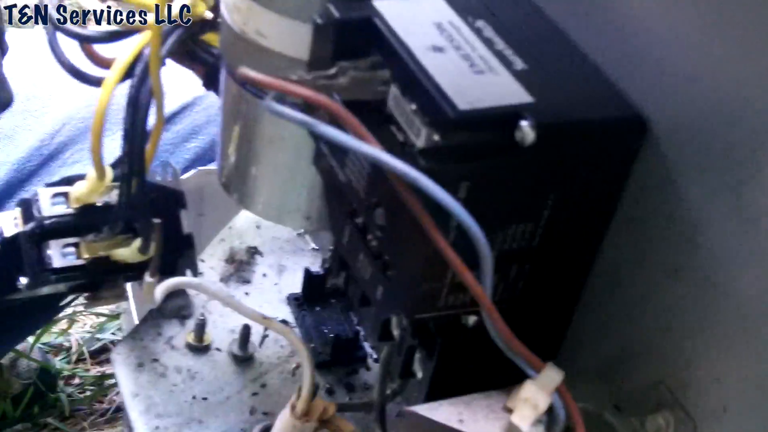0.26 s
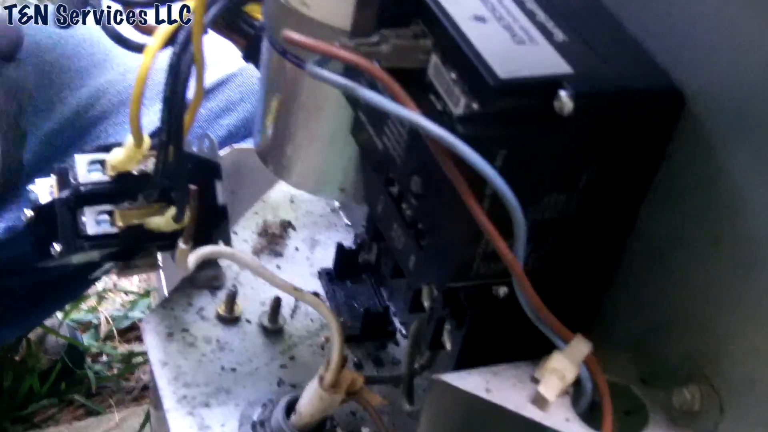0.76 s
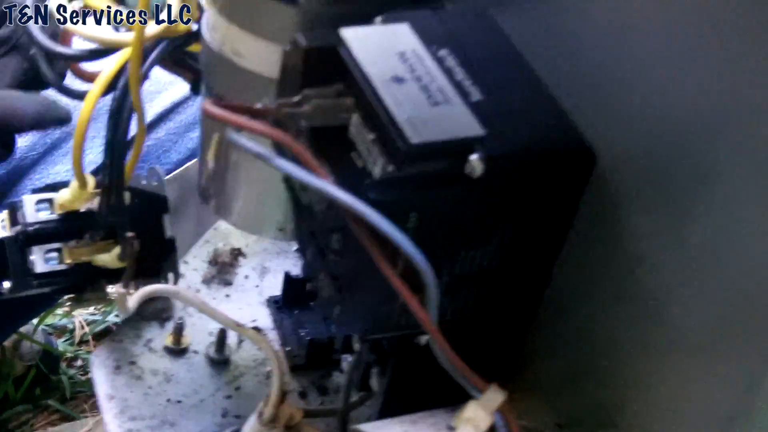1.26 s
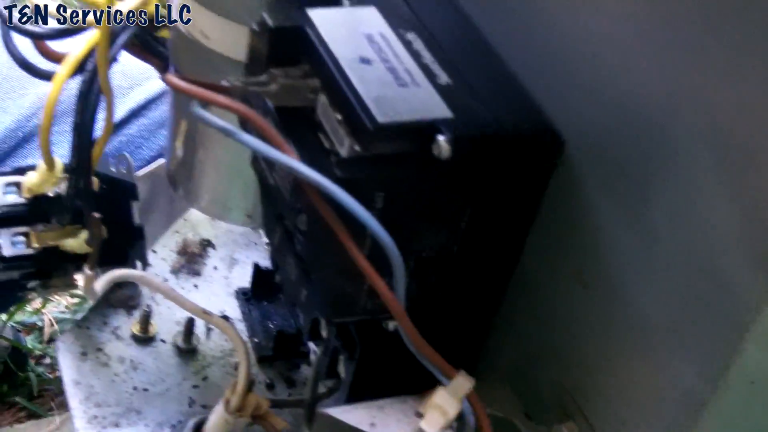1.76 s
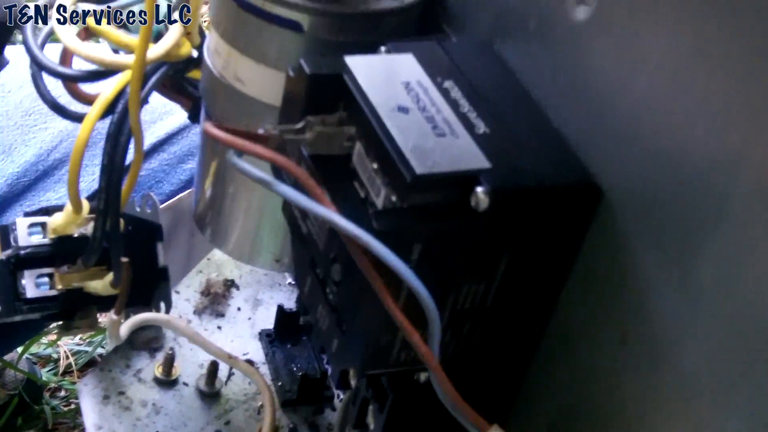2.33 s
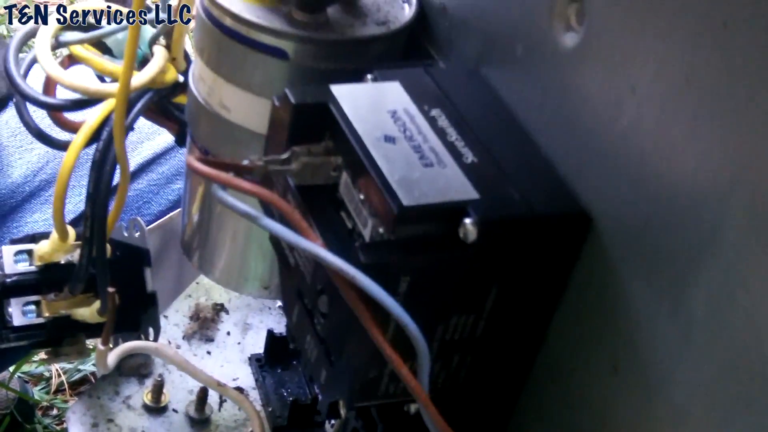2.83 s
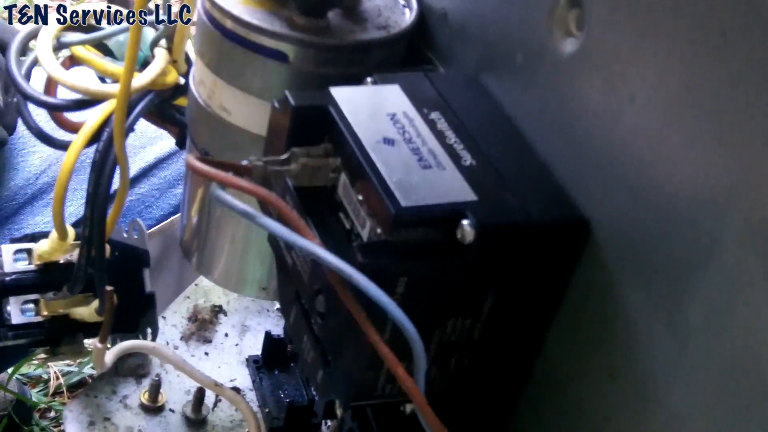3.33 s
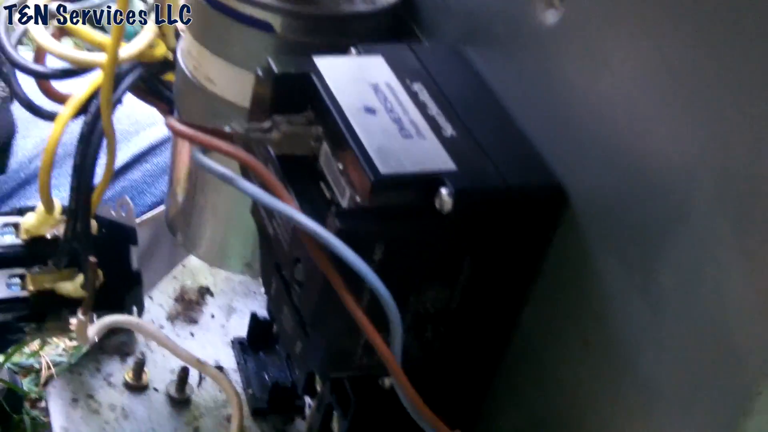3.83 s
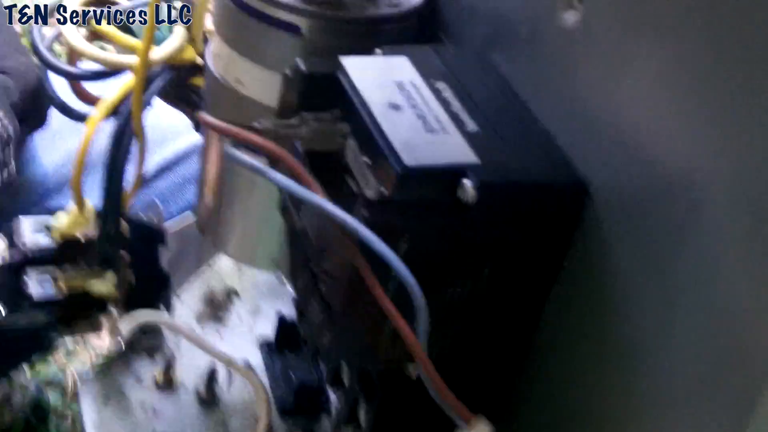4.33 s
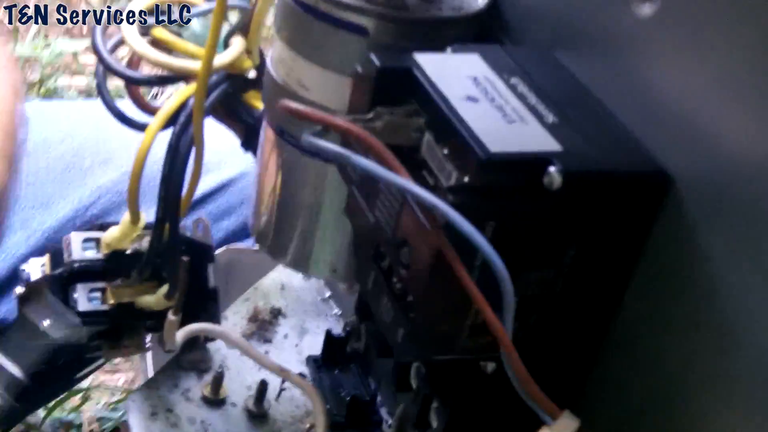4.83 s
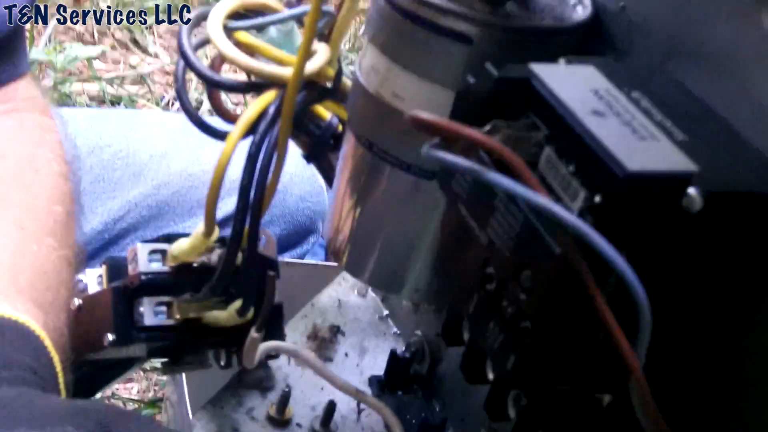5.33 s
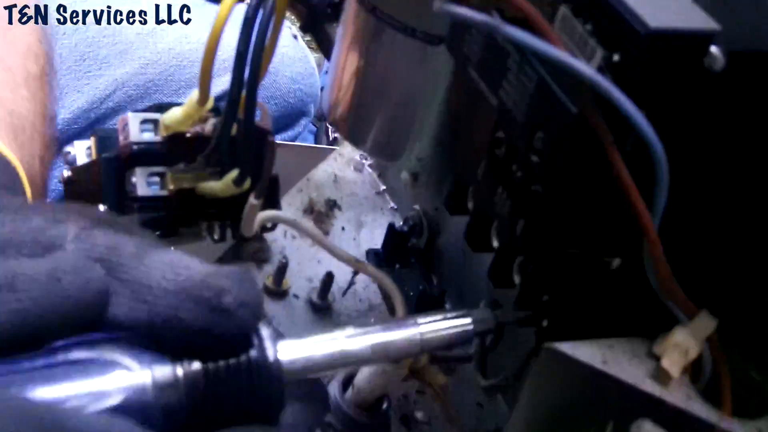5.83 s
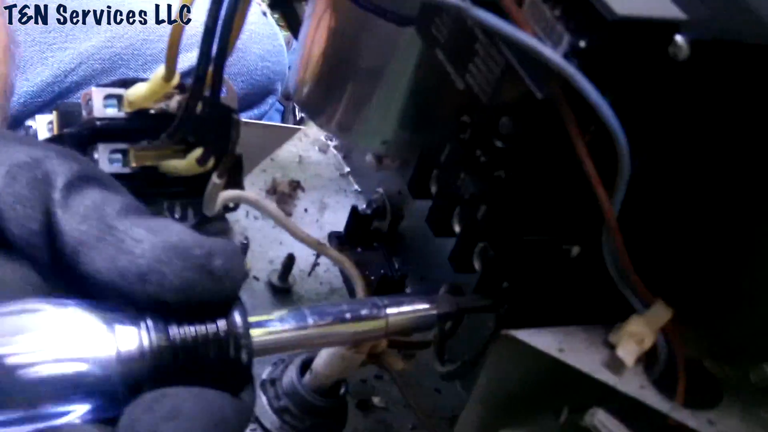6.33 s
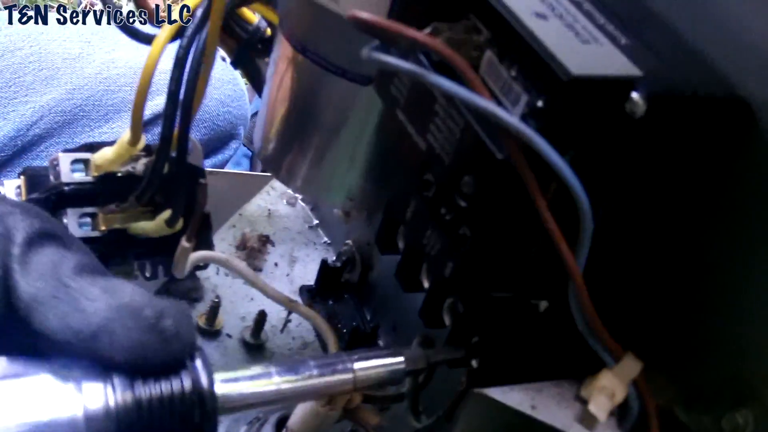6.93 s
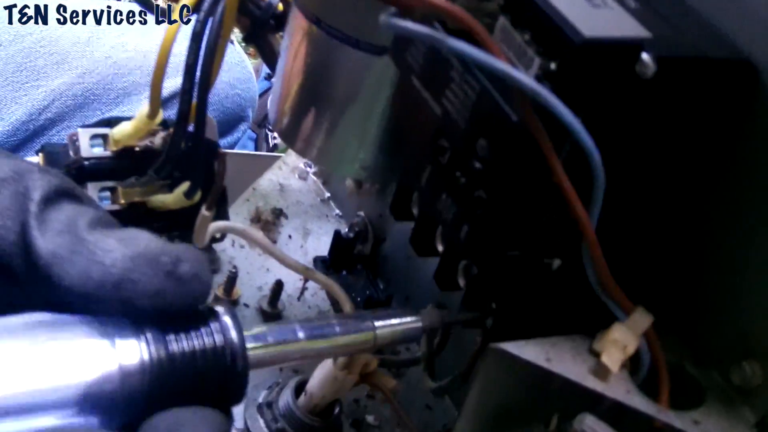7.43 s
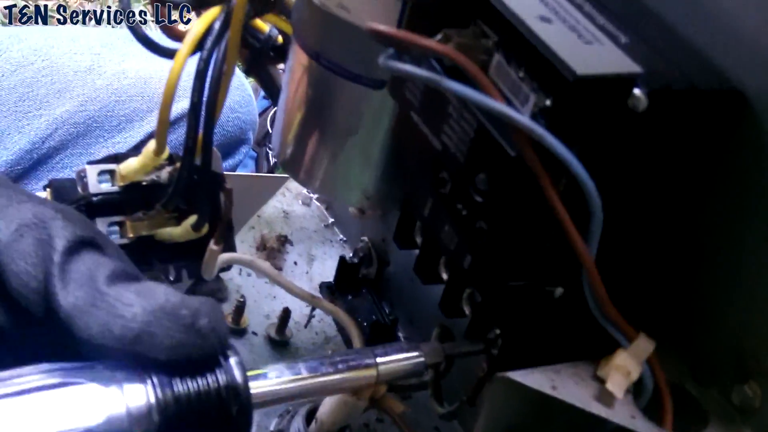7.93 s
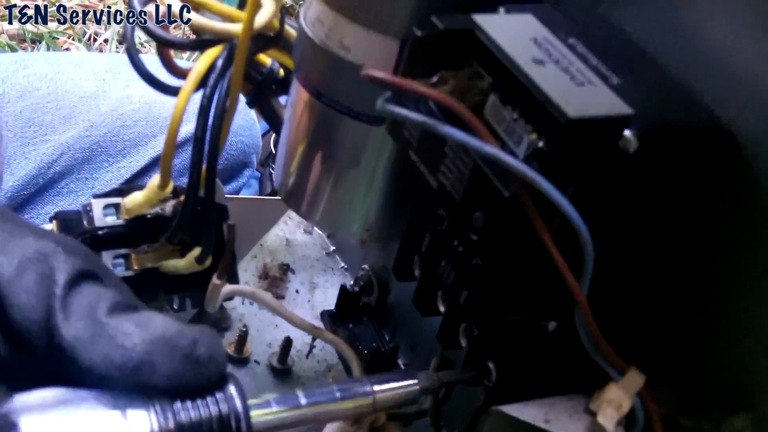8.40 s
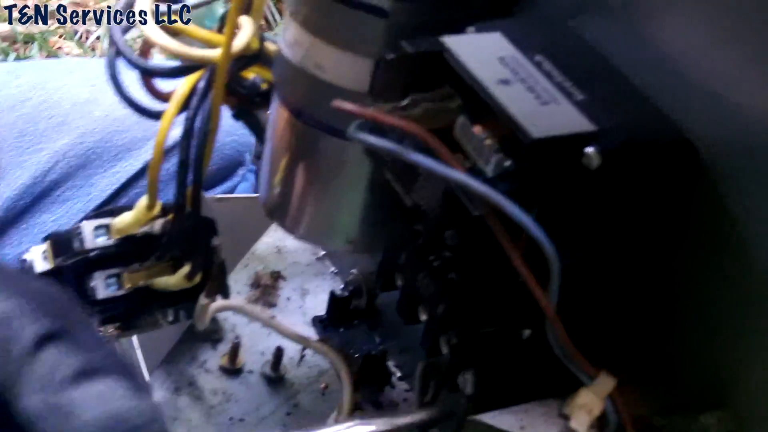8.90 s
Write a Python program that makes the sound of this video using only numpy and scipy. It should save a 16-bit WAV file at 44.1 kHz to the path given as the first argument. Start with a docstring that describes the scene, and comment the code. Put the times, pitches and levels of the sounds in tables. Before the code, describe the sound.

Close up outdoors, terminals click sharply, then a tool raps hollow sheet metal and turns a screw in grainy strokes, with brief rubbery squeaks.

```python
"""Gloved hands work on the wiring in an outdoor air conditioner's control panel, close to one microphone.
A connector rasps off its tab and terminals snap: bursts of tiny impacts and wall reflections, some tabs ringing.
Then a screwdriver knocks in the sheet-metal cabinet, whose modes ring and rattle, and turns a screw in short
strokes of grainy friction noise. The glove squeaks in gliding tones and rustles in puffs of noise.
Under it all lies a low outdoor hiss of filtered noise."""
import sys
import numpy as np
from scipy import signal
from scipy.fft import rfft, irfft, next_fast_len
from scipy.io import wavfile
from scipy.ndimage import uniform_filter1d

SR = 44100
rng = np.random.default_rng(int(sys.argv[2]) if len(sys.argv) > 2 else 0)


def unload_audio(sound):
    """Save the sound as a 16-bit wav file, at the path given as the first command line argument."""
    columns = np.transpose(np.atleast_2d(sound))
    # keep every value between -1 and 1, then stretch to whole-number steps
    steps = np.round(np.clip(columns, -1, 1) * 32767)
    wavfile.write(sys.argv[1], SR, steps.astype(np.int16))


N = 403956  # samples, about 9.2 s


# Levels are those of the sources, ahead of the microphone's own filters in record().
def amp(db):
    """Decibels to gain."""
    return 10 ** (np.asarray(db) / 20)


def read(points, hz):
    """A spectrum's value at hz, on a log-frequency axis."""
    f, value = np.transpose(points)
    return np.interp(np.log(hz + 1), np.log(f + 1), value)


def evened(x):
    """Scales to rms 1."""
    return x / np.sqrt(np.mean(x ** 2) + 1e-20)


def blow(x, db):
    """Scales a hit to the energy of 10 ms at level db."""
    return amp(db) * x * np.sqrt(0.01 * SR / (np.sum(x ** 2) + 1e-20))


def add(mix, s, sound):
    """Mixes a sound in at time s."""
    part = mix[max(round(s * SR), 0):][:len(sound)]
    part += sound[:len(part)]


def hump(hz, centre_hz, octaves):
    """A bell from 0 to 1 round a pitch."""
    return np.exp(-0.5 * (np.log2((hz + 1) / centre_hz) / octaves) ** 2)


def shaped(x, points):
    """Filters a long sound by a spectrum."""
    size = next_fast_len(len(x) + 4096)
    gain = amp(read(points, np.fft.rfftfreq(size, 1 / SR)))
    return irfft(rfft(x, size) * gain, size)[:len(x)]


def coloured(x, points, centre_hz, lift_db, octaves, size):
    """Gives a hit its broad colour with a causal filter, keeping its sharp start and fine ripple."""
    z = np.fft.fft(x)
    hz = abs(np.fft.fftfreq(len(x), 1 / SR))
    own_power = uniform_filter1d(abs(z) ** 2, size, mode="wrap")
    own_colour = np.sqrt(abs(own_power) + 1e-12)
    wanted_db = read(points, hz) + lift_db * hump(hz, centre_hz, octaves)
    log_gain = np.log(amp(wanted_db) / own_colour)
    causal_gain = np.exp(np.conj(signal.hilbert(log_gain)))
    return np.fft.ifft(z * causal_gain).real


# Colour of the outdoor air and hiss. Each row: frequency in Hz, relative density in dB per Hz.
AIR_SPECTRUM = [(20, -29), (70, -27), (115, -36.5), (175, -33.5), (285, -42.5), (490, -35), (590, -38),
                (720, -36.5), (1020, -36), (1400, -40.5), (2100, -46.5), (4800, -48.5), (6300, -57.5),
                (7300, -61.5), (10500, -55.5), (15500, -56.5)]
AIR_DB = -43.5


def outdoors(drift_db=1.0):
    """Steady outdoor air and microphone hiss: filtered noise drifting in faint patches of time and pitch."""
    z = signal.stft(rng.standard_normal(N), nperseg=1024)[2]
    patches = uniform_filter1d(rng.standard_normal(z.shape), size=7, axis=0)
    patches = evened(uniform_filter1d(patches, size=16, axis=1))
    air = signal.istft(z * amp(drift_db * patches), nperseg=1024)[1][:N]
    return amp(AIR_DB) * evened(shaped(air, AIR_SPECTRUM))


# Broad colour of a contact click. Each row: frequency in Hz, relative density in dB per Hz.
CLICK_SPECTRUM = [(60, -9), (400, -12.5), (750, -0.5), (2500, -0.5), (5400, -2), (6400, -9.5), (7300, -16),
                  (11000, -18.5), (15500, -45)]


def click(chatter_s, hz, lift_db, echo_db, echo_t60, crisp_db=7, size=4096):
    """A cluster of tiny impacts with dense reflections from the panel walls."""
    t = np.arange(size) / SR
    impacts, walls = rng.standard_normal((2, size))
    contact = impacts ** 3 * np.exp(-(t / chatter_s) ** 2)
    echo = walls * amp(-60 * t / echo_t60) * (1 - np.exp(-t / 0.00047))
    brevity = np.log2(0.0019 / chatter_s)  # a briefer contact has a crisper top
    spectrum = [(f, db + crisp_db * brevity * (f > 7000)) for f, db in CLICK_SPECTRUM]
    both = blow(contact, 0) + blow(echo, echo_db)
    return coloured(both, spectrum, hz, lift_db, octaves=0.61, size=110)


# Connectors and wires snapping, with one low thump of a pushing glove at 0.6036 s. Each row: start in seconds,
# # level in dB, chatter time in seconds, emphasised pitch in Hz, lift at that pitch in dB (a cut if negative).
SNAPS = [(0.5712, -28, .0015, 3300, 14), (.583, -26, .0035, 3960, 7), (0.6036, -25.5, 0.0014, 395, 19.5),
         (0.615, -26.5, 0.0014, 3760, 13), (0.6165, -25, 0.001, 3060, 2), (.633, -29, .001, 4050, 16),
         (1.8594, -22.5, 0.0027, 5200, 5), (1.9145, -31.5, 0.011, 4400, 5), (1.936, -34, 0.0098, 2970, 5),
         (2.012, -34, 0.026, 2500, 4), (2.049, -19.5, 0.0016, 4430, 11), (2.059, -20.5, 0.0059, 4730, 8.5),
         (2.081, -29.5, 0.025, 2600, 14), (2.1096, -26, 0.0024, 2000, 5.5),
         (2.2808, -23.5, 0.0057, 1610, 5.5), (2.301, -30, 0.0042, 2860, 11), (2.656, -44, .0039, 3400, 29),
         (2.818, -38, 0.0033, 3500, 2), (3.105, -36, 0.004, 3080, 12), (3.813, -43.5, .0023, 4460, 9),
         (3.94, -29, .003, 5300, 9), (3.9439, -22.5, 0.0029, 1600, 3.5), (4.1787, -17, 0.0011, 1510, 9.5),
         (4.87, -40.5, .002, 2800, 9), (4.981, -35.5, .0017, 3480, 2), (5.944, -45, .0018, 2500, 13),
         (6.594, -44, 0.0026, 3400, 17), (7.187, -24.5, 0.0044, 3250, 15), (7.905, -38, .0027, 2440, 9),
         (8.365, -43.5, 0.004, 4000, -6), (8.917, -32.5, 0.0045, 2050, 17)]
# Stiff tabs left ringing by a snap. Each row: start in seconds, pitch in Hz, level in dB, t60 in seconds.
TABS = [(1.859, 5560, -24.5, 0.013), (1.860, 2440, -23.5, 0.043), (1.861, 750, -28, 0.079),
        (2.058, 646, -36.5, 0.12)]
# Wall reflections against the snap, at 3 ms of chatter; they gain with each doubling of it.
ECHO_DB, ECHO_DB_PER_OCTAVE = -6, 2.5


def connectors():
    """Dry snaps of terminals, the briefest the driest; two of them leave tabs ringing as decaying sines."""
    out = np.zeros(N)
    t = np.arange(SR // 5) / SR
    for s, db, chatter_s, hz, lift_db in SNAPS:
        echo_db = ECHO_DB + ECHO_DB_PER_OCTAVE * np.log2(chatter_s / 0.003)
        snap = click(chatter_s, hz, lift_db, echo_db, echo_t60=0.05, crisp_db=7.5)
        add(out, s, blow(snap, db))
    for s, hz, db, t60 in TABS:
        ring = np.sin(2 * np.pi * hz * t) * amp(-60 * t / t60)
        add(out, s, blow(ring, db))
    return out


def slips(count, grain_db, catch_db, ripple_db):
    """Friction: dense tiny slips that catch and let go, with a colour that differs from grip to grip."""
    hiss, pressure = rng.standard_normal((2, count))
    catch = evened(uniform_filter1d(uniform_filter1d(pressure, size=160), size=100))
    grain = np.minimum(rng.exponential(1, count), 5)
    grains = hiss * amp(grain_db * grain + catch_db * catch)
    hz = np.geomspace(300, 16000, 60)
    grip_colour = np.transpose([hz, ripple_db * rng.standard_normal(len(hz))])
    return evened(shaped(grains, grip_colour))


TICK_SPREAD_DB = 3


def ticks(count, per_s):
    """Stray light clicks at random moments, of uneven strength."""
    out = np.zeros(count)
    for at in np.flatnonzero(rng.random(count) < per_s / SR):
        tick = click(0.0042, 2850, lift_db=6, echo_db=-5.5, echo_t60=0.03)
        add(out, at / SR, blow(tick, TICK_SPREAD_DB * rng.standard_normal()))
    return out


# Main modes of the cabinet. Each row: frequency in Hz, relative level in dB, t60 in seconds.
CABINET_MODES = [(156, -4.5, 0.079), (255.6, -12.5, 0.24), (336, -12.5, 0.37), (471, -4, 0.12),
                 (531.2, -6.5, 0.16), (636, -14.5, 0.25), (690.8, -1.5, 0.11), (767, -10, 0.094),
                 (905, -5.5, 0.073), (1070, -2, 0.073), (1075, -3, 0.093), (1355, -0.5, 0.045),
                 (1540, 0, 0.052), (1975, 0, 0.1)]
# Colour of its many weak modes. Each row: frequency in Hz, relative density in dB per Hz.
SHEET_SPECTRUM = [(60, -13), (220, -4), (450, -2.5), (1100, -8), (1700, -7.5), (3500, -12.5), (5500, -25),
                  (8000, -46)]


def sheet_metal(centre_hz, modes_db, dense_t60, detune=0.012, size=16384):
    """The cabinet's ring: main modes, weighted by the spot struck and detuned by the hand, among weak ones."""
    t = np.arange(size) / SR
    hz, db, t60 = np.transpose(CABINET_MODES)[:, :, None]
    spot_db, load, phase = rng.standard_normal((3, len(hz), 1))
    weight = amp(db + 3.9 * spot_db + 11.6 * hump(hz, centre_hz, 0.57))
    decay = np.exp(-np.log(1000) * t / t60)
    turns = hz * (1 + detune * load) * t + phase
    modes = np.sum(weight * decay * np.sin(2 * np.pi * turns), 0)
    modes = modes * (1 - np.exp(-t / 0.00048))  # soft onset
    dense = rng.standard_normal(size) * amp(-60 * t / dense_t60)
    dense = coloured(dense, SHEET_SPECTRUM, centre_hz, lift_db=10.0, octaves=0.35, size=110)
    return blow(modes, modes_db) + blow(dense, 0)


def through_cabinet(drive):
    """Friction shakes the sheet metal, which rings on after it."""
    body = sheet_metal(730, modes_db=4.5, dense_t60=0.1)
    return signal.oaconvolve(drive, body / np.linalg.norm(body))


# Hard scrapes that start and stop at once. Each row: start in seconds, length in seconds, level in dB,
# fizz level in dB, rumble in the cabinet in dB.
SCRAPES = [(0.576, 0.06, -28.5, -50, -64), (2.258, 0.055, -37.5, -78, -66), (6.009, 0.039, -31.5, -43, -48),
           (6.068, 0.05, -29.5, -38.5, -37.5), (6.171, 0.0316, -31, -41.5, -50),
           (6.764, .018, -30.5, -68, -25.5)]
# Colour of rubbing contact. Each row: frequency in Hz, relative density in dB per Hz.
RUB_SPECTRUM = [(60, -6), (400, -25), (1350, -5.5), (1950, -1), (2400, -5.5), (3000, -3.5), (4000, -1),
                (5300, -6.5), (6500, -14), (7500, -19.5), (11500, -27), (15500, -41)]
# Colour of the bright fizz. Each row: frequency in Hz, relative density in dB per Hz.
FIZZ_SPECTRUM = [(60, -60), (4500, -36), (6200, 12), (7200, -7), (9000, 2.5), (12000, 2), (13700, -6),
                 (15000, -20)]
CATCHES_PER_S, CATCH_DB = 90, -5  # the blade catching on metal; level against the hiss


def scraping():
    """Metal dragged hard over metal: a short, catching rasp of slips with a bright fizz."""
    out = np.zeros(N)
    for s, length_s, db, fizz_db, rumble_db in SCRAPES:
        count = int(length_s * SR)
        press = signal.windows.tukey(count, 0.3)
        rasp = slips(count, grain_db=2.0, catch_db=-0.1, ripple_db=2.5) * press
        catches = press * ticks(count, CATCHES_PER_S)
        contact = evened(shaped(rasp, RUB_SPECTRUM)) + amp(CATCH_DB) * catches
        fizz = evened(shaped(rasp, FIZZ_SPECTRUM))
        add(out, s, amp(db) * evened(contact) + amp(fizz_db) * fizz)
        add(out, s, amp(rumble_db) * through_cabinet(rasp))
    return out


# Light rustle of gloves and wires, one list for each spell of handling.
# Each row: time in seconds, level in dB.
RUSTLE_SPELLS = [
    [(2.33, -55.5), (2.476, -54.5), (2.862, -53.5), (3.05, -53.5)],
    [(4.3, -56.5), (4.682, -52.5), (4.878, -46), (5.048, -55.5), (5.35, -53)],
    [(5.9, -51), (6.09, -44), (6.45, -51), (6.66, -49), (7.13, -51), (7.48, -46), (8.33, -54), (8.61, -48),
     (9.15, -57.5)],
]
RUSTLE_DB, RUSTLE_RUMBLE_DB = 0, -1  # hiss and rumble against that level
STILL_DB = -56.5  # the level at which the hands are still
TICKS_PER_S, TICK_DB = 6, 4  # wires brushing each other; level against the rustle
PUFF_S, PUFF_DB = 0.04, 4  # the rustle comes in uneven puffs


def rustling():
    """Gloves brush the wires in puffs of slips; the busier the hands, the louder the rustle and stray ticks."""
    t = np.arange(N) / SR
    spells_db = [np.interp(t, *np.transpose(spell), left=STILL_DB, right=STILL_DB)
                 for spell in RUSTLE_SPELLS]
    level_db = np.max(spells_db, axis=0)
    motion = np.sqrt(np.maximum(amp(level_db) ** 2 - amp(STILL_DB) ** 2, 0))
    pressure = rng.standard_normal(size=1024)
    puffs = evened(amp(PUFF_DB * np.interp(t / PUFF_S, np.arange(len(pressure)), pressure)))
    grains = puffs * slips(N, grain_db=2.0, catch_db=3.5, ripple_db=1.0)
    hiss = amp(RUSTLE_DB) * evened(shaped(grains, RUB_SPECTRUM))
    rumble = amp(RUSTLE_RUMBLE_DB) * through_cabinet(grains)[:N]
    return motion * (hiss + rumble + amp(TICK_DB) * ticks(N, TICKS_PER_S))


# Glove sticking and slipping on wires and handle. Each row: start in seconds, length in seconds,
# level in dB, first pitch in Hz, last pitch in Hz.
SQUEAKS = [(2.385, 0.2, -56.5, 3800, 4010), (2.766, 0.01, -38, 1755, 1660), (2.779, .016, -45, 4900, 4900),
           (6.012, 0.021, -34, 1390, 2320), (6.03, 0.032, -32.5, 1820, 1890),
           (6.075, 0.02, -29.5, 2550, 7070), (7.172, 0.032, -33.5, 1897, 1927),
           (8.488, .011, -30, 4920, 4600), (8.5, 0.017, -33.5, 5070, 4920)]


def squeaks(jitter=0.028, overtone_db=-7, flutter=0.25):
    """Short gliding stick-slip tones of three harmonics, with unsteady pitch and strength."""
    out = np.zeros(N)
    for s, length_s, db, first_hz, last_hz in SQUEAKS:
        count = int(length_s * SR)
        waver, grip = uniform_filter1d(rng.standard_normal((2, 16384)), size=60)[:, :count]
        hz = np.linspace(first_hz, last_hz, count) * (1 + jitter * evened(waver))
        turns = np.cumsum(hz) / SR
        tone = np.zeros(count)
        for k in range(1, 4):
            tone += amp(overtone_db * k + read(RUB_SPECTRUM, k * hz)) * np.sin(2 * np.pi * k * turns)
        strength = np.exp(flutter * evened(grip)) * signal.windows.tukey(count, 0.4)
        add(out, s, amp(db) * evened(tone * strength))
    return out


# Strokes of the gloved hand, mostly turning the screwdriver. Each row: fastest moment in seconds,
# hiss of the glove in dB, rumble in the cabinet in dB.
STROKES = [(2.79, -43.5, -66), (4.53, -48.5, -66), (5.64, -66, -34.5), (6.755, -34.5, -39),
           (6.91, -53, -38.5), (7.18, -34.5, -31.5), (7.345, -36, -59), (7.565, -36.5, -37),
           (7.865, -37, -33.5), (8.026, -37, -44), (8.19, -34.5, -37.5), (8.35, -37.5, -54),
           (8.515, -37, -44), (8.765, -40, -30.5), (8.945, -46.5, -39)]
STROKE_RISE_S, STROKE_FALL_S = 0.04, 0.025  # every stroke gathers speed and stops more quickly


def rubbing():
    """Strokes of glove and tool: slips that swell, catch and fade, heard directly and through the cabinet."""
    out = np.zeros(N)
    t = np.arange(-SR // 5, SR // 5) / SR
    speed = np.exp(-np.maximum(-t / STROKE_RISE_S, t / STROKE_FALL_S) ** 1.47)
    for s, hiss_db, rumble_db in STROKES:
        grains = slips(len(t), grain_db=1.0, catch_db=1.0, ripple_db=3.5)
        catches = amp(CATCH_DB) * ticks(len(t), CATCHES_PER_S)
        contact = evened(shaped(grains, RUB_SPECTRUM)) + catches
        add(out, s + t[0], amp(hiss_db) * speed * evened(contact))
        add(out, s + t[0], amp(rumble_db) * through_cabinet(speed * grains))
    return out


# Tool against the cabinet. Each row: start in seconds, contact click in dB, ring of the sheet metal in dB.
KNOCKS = [(4.732, -31.5, -21.5), (4.789, -38, -27), (5.1955, -38, -36.5), (5.393, -32.5, -24),
          (5.443, -29, -29.5), (5.4935, -26, -20), (5.5224, -32.5, -31), (5.5763, -38, -32),
          (5.617, -58, -31), (5.96, -29, -28.5), (6.0931, -42, -23.5), (6.155, -32.5, -27),
          (6.802, -31.5, -21.5), (6.816, -36, -20), (7.432, -40.5, -26.5), (7.6006, -35, -25),
          (7.843, -41, -27), (7.926, -53, -32), (8.059, -54, -35.5), (8.161, -36, -26),
          (8.2254, -29.5, -31.5), (8.44, -39, -29.5), (8.58, -28.5, -34), (8.72, -26.5, -35.5),
          (8.9163, -38.5, -41)]
# The ring rises as the tool moves in from the loose wall to the stiff corner with the screw, then settles
# somewhat lower. Each row: time in seconds, emphasised pitch in Hz.
RING_PITCH = [(4.75, 490), (5.5, 670), (6.8, 1130), (7.8, 890), (8.9, 890)]
# After a knock the loose panel rattles on; level against the ring.
RATTLE_DB, RATTLE_RISE_S, RATTLE_FALL_S = -20.5, 0.018, 0.079


def screwdriver(impact_db=-7):
    """Each knock is a hard impact with a brief chatter of the blade, the cabinet's ring and a fading rattle."""
    out = np.zeros(N)
    t = np.arange(SR // 3) / SR
    shake = (1 - np.exp(-t / RATTLE_RISE_S)) * np.exp(-t / RATTLE_FALL_S)
    shake = shake / shake.max()
    for s, click_db, ring_db in KNOCKS:
        hz = np.interp(s, *np.transpose(RING_PITCH))
        impact = click(0.00094, 590, lift_db=22.0, echo_db=-7, echo_t60=0.035, crisp_db=-5.0)
        chatter = click(0.0013, 3000, lift_db=9.5, echo_db=12.5, echo_t60=0.044)
        contact = blow(impact, impact_db) + blow(chatter, 0)
        ring = sheet_metal(hz, modes_db=1.5, dense_t60=0.12)
        rattle = through_cabinet(shake * rng.standard_normal(len(t)))
        add(out, s, blow(contact, click_db))
        add(out, s, blow(ring, ring_db))
        add(out, s, amp(ring_db + RATTLE_DB) * rattle)
    return out


def scene():
    """All sources at one close microphone."""
    background = outdoors()
    metal = connectors() + scraping() + screwdriver()
    glove = rustling() + squeaks() + rubbing()
    return (background + metal + glove)[None]


# The microphone's dead spot. Each row: frequency in Hz, gain in dB.
MICROPHONE_NOTCH = [(6900, -2), (7450, -7), (7750, -27), (8100, -21), (8450, -12), (8900, -6)]
EDGE_HZ = 15600  # upper limit of the band


def record(dry):
    """The microphone's notch, then the band limit."""
    heard = shaped(dry[0], MICROPHONE_NOTCH)
    low_pass = signal.firwin(401, EDGE_HZ, window=("kaiser", 8), fs=SR)
    return signal.oaconvolve(heard, low_pass, "same")[None]


dry = scene()
out = record(dry)
unload_audio(out)
```